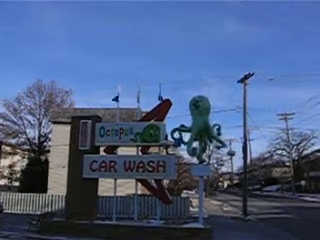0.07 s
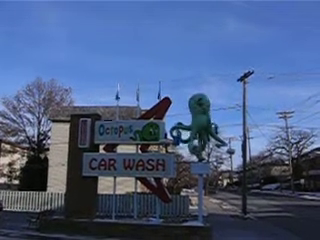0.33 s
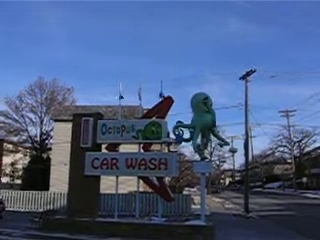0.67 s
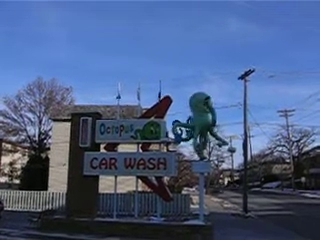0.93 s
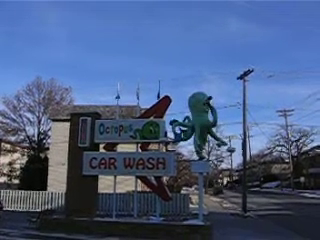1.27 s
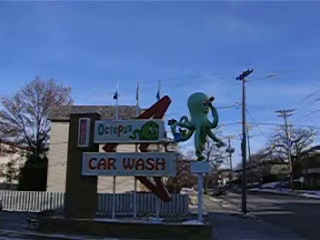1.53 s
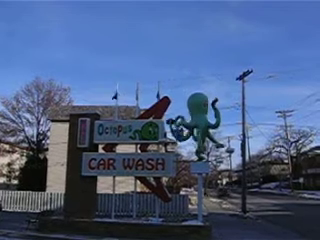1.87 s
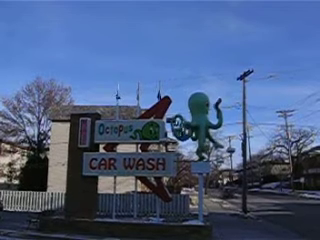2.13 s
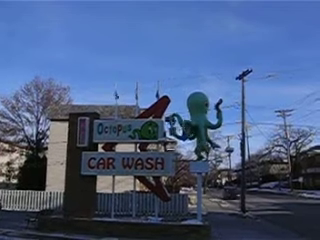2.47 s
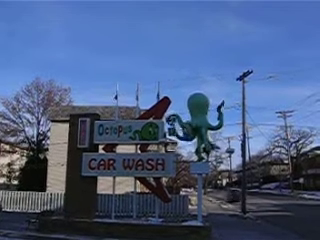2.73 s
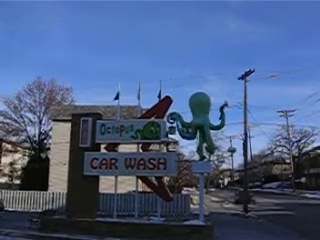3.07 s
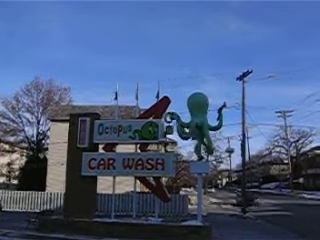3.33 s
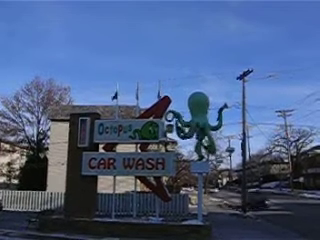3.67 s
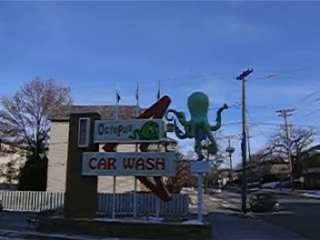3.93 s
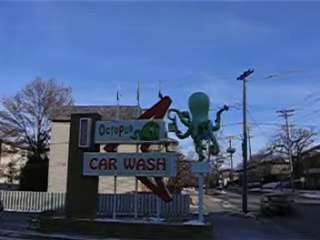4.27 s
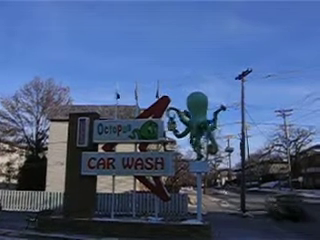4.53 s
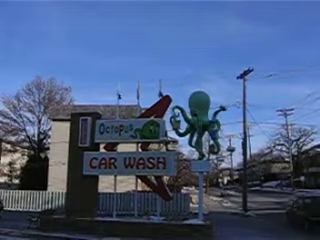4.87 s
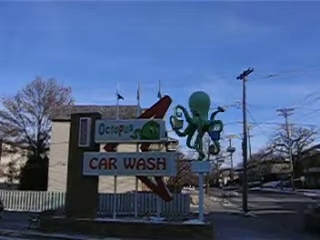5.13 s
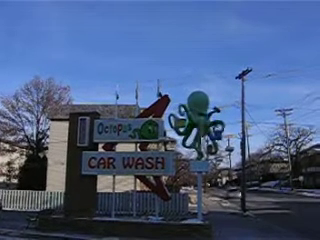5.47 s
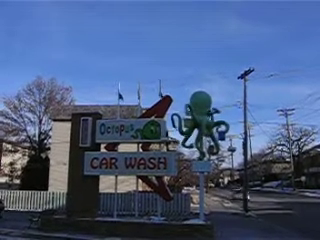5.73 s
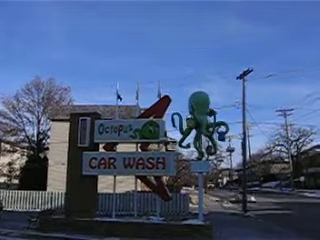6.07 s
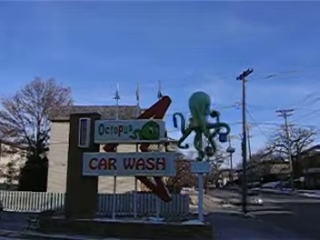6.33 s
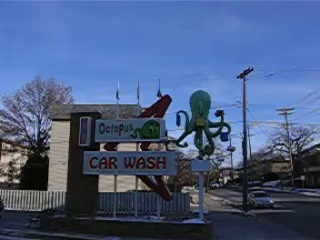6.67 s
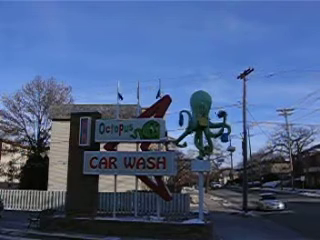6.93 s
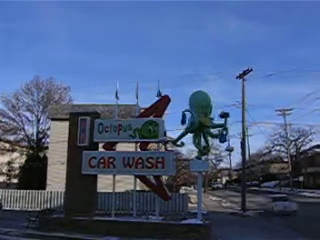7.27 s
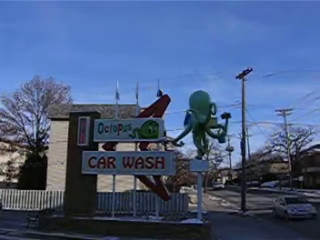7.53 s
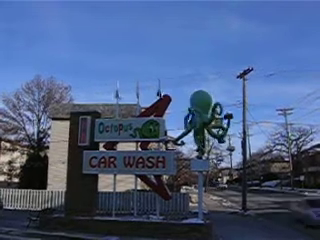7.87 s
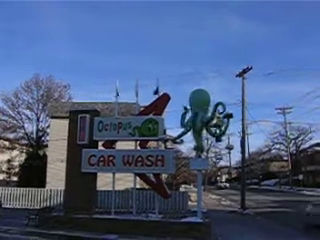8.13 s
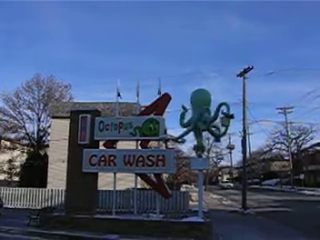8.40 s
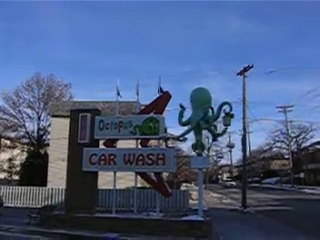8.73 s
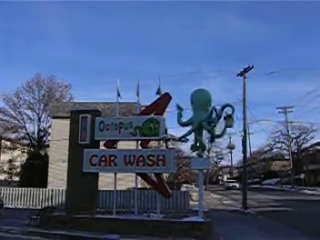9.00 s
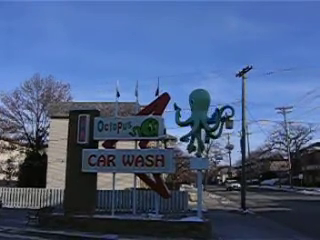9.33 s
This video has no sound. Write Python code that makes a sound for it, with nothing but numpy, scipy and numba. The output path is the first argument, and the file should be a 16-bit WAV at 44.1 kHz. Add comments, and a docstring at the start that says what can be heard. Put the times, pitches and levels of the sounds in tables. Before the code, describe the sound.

Distant engines rumble throughout at a street corner, with a low exhaust drone swelling in slow arches and a steady wash of tyre noise. A faint machine hum, thin whines and an airy whistle sit inside it, joined by very faint high squeals until nearly 6 seconds. A car fades away at the start. Light wind buffets the microphone, with thumps around 2, 2.4 and 3.4 seconds that briefly duck the other sounds. A car approaches and passes close at about 4.7 seconds, its tyres roaring, hissing and rasping. One tiny click comes at 6 seconds as the next car's tyres sing; it passes at about 7 seconds with a deeper boom. A slightly softer car goes by near 9 seconds, with further gusts around 7.7, 8.5 and 9.3 seconds. The sound is mono with dull treble, as from a small camera.

```python
"""A street corner in light wind. Distant engines rumble and one exhaust drones on its firing rate.
Cars roll past, two on the near lane: bodies boom, tyres roar, rush and hiss. A machine's hum, thin
whines, an airy whistle and faint high squeals sit in the tyre noise. Eddies buffet the microphone
port of a small camera, whose limiter ducks everything on loud thumps. There is one tiny click."""
import sys
import numpy as np
from scipy import signal
from scipy.fft import rfft, irfft, next_fast_len
from scipy.io import wavfile
from scipy.ndimage import uniform_filter1d, map_coordinates
from numba import njit

SR = 44100
rng = np.random.default_rng(int(sys.argv[2]) if len(sys.argv) > 2 else 0)


def store_pcm(level_fs):
    """Save levels as 16-bit WAV."""
    pcm = np.round(np.clip(level_fs, -1, 1) * 32767).astype(np.int16)
    wavfile.write(sys.argv[1], SR, np.atleast_2d(pcm).T)


N = 418068
TIME_S = np.arange(N) / SR


def amp(db):
    """Decibels to gain."""
    return 10 ** (np.asarray(db) / 20)


def unit(x):
    """Scale to rms 1."""
    return x / np.sqrt(np.mean(x ** 2) + 1e-20)


def curve(rows):
    """Time-value rows to one value per sample."""
    return np.interp(TIME_S, *np.transpose(rows))


def bell(at_s, sigma_s):
    """Gaussian swell, peak 1."""
    return np.exp(-.5 * ((TIME_S - at_s) / sigma_s) ** 2)


def wobble(rate_hz):
    """Smooth random curve, rate_hz knots a second."""
    knots = rng.standard_normal(int(N * rate_hz / SR) + 4)
    return map_coordinates(knots, [TIME_S * rate_hz])


def filtered(x, response):
    """Zero-phase filter with gain response(hz)."""
    size = next_fast_len(N + 8192)
    return irfft(rfft(x, size) * response(np.fft.rfftfreq(size, 1 / SR)), size)[:N]


def noise(spectrum, patchy_db):
    """Coloured noise, rms 1, with random gain patches in time and frequency."""
    bins = signal.stft(rng.standard_normal(N), nperseg=512)[2]
    patches = uniform_filter1d(rng.standard_normal(bins.shape), size=6, axis=0)
    patches = uniform_filter1d(patches, size=14, axis=1)
    patchy = signal.istft(bins * amp(patchy_db * unit(patches)), nperseg=512)[1][:N]
    hz, db = np.transpose(spectrum)
    colour = lambda f: amp(np.interp(np.log(f + 1), np.log(hz), db, left=-60, right=-120))
    return unit(filtered(patchy, colour))


def tone(hz, order=1):
    """Sine, rms 1, on a multiple of a pitch curve."""
    return np.sqrt(2) * np.sin(2 * np.pi * (order * np.cumsum(hz) / SR + rng.random()))


def fuzzy_tone(hz, width_hz):
    """Narrow noise, rms 1, around a pitch curve."""
    centred = wobble(width_hz) * tone(hz)
    detuned = wobble(width_hz) * tone(hz + .3 * width_hz * wobble(15))
    return unit(centred + detuned)


# start/s, length/s, f/Hz, level/dB
SQUEALS = [(0.357, 0.25, 5235, -55.5), (1.265, 0.27, 5245, -55.5), (1.52, 0.36, 5450, -58.5),
           (1.883, 0.86, 5504, -55.5), (2.939, .25, 5280, -58), (3.305, .33, 5490, -56),
           (3.646, .5, 5500, -51), (4.08, 0.4, 5230, -56.5), (4.677, 0.67, 5235, -57),
           (5.117, 0.56, 5480, -55.5)]

def squeals(fade_s=.05):
    """Faint, chattering squeals far off."""
    starts_s, _, pitches_hz, _ = np.transpose(SQUEALS)
    latest = np.maximum(np.searchsorted(starts_s, TIME_S) - 1, 0)
    hz = pitches_hz[latest]
    gain = sum(amp(db) * np.clip(np.minimum(TIME_S - s, s + length_s - TIME_S) / fade_s, 0, 1)
               for s, length_s, _, db in SQUEALS)
    return .7 * gain * (tone(hz + 6 * wobble(30)) + fuzzy_tone(hz, width_hz=45))


# t/s, level/dB
WHISTLE_SWELLS = [(3.6, -49), (4.6, -49), (7.55, -47), (8.9, -48)]

def whistle(centre_hz=4025, drift_hz=20, rest_db=-49.5):
    """An airy whistle drifts and swells now and then."""
    swells = sum(amp(db) * bell(s, sigma_s=.12) for s, db in WHISTLE_SWELLS)
    return (amp(rest_db) + swells) * fuzzy_tone(centre_hz + drift_hz * wobble(2.5), width_hz=110)


# f/Hz, rms level/dB
WHINES = [(1016, -45), (1215, -52), (1411, -48.5), (1826, -57.5), (2822, -54.5), (4829, -59.5)]

def whines():
    """Thin sustained tones, wavering slightly."""
    return sum(amp(db + 2.4 * wobble(3)) * tone(hz + .83 * wobble(6)) for hz, db in WHINES)


# t/s, level/dB
HUM_LEVEL = [(0, -54.5), (.8, -36.5), (2.1, -48.5), (2.9, -36), (6.3, -35.5), (7.1, -39), (9.48, -42.5)]

def machine_hum(pitch_hz=704.8):
    """A machine hums on one unsteady tone."""
    return amp(curve(HUM_LEVEL) + 1.1 * wobble(7.8)) * tone(pitch_hz + 2.6 * wobble(14))


# f/Hz, relative density/dB
RUMBLE_SPECTRUM = [(35, -23.5), (65, -2), (90, 0.5), (150, -5), (240, -11.5), (340, -16), (500, -23.5),
                   (1200, -60.5)]

def distant_engines(level_db=-24, drift_db=.6):
    """Many engines blur into a rumble."""
    return amp(level_db + drift_db * wobble(5)) * noise(RUMBLE_SPECTRUM, patchy_db=1.17)


# multiple of the firing rate, relative level/dB
EXHAUST_HARMONICS = [(1, 1.5), (2, -14.5), (3, -20.5), (4, -26)]
# start/s, length/s, level/dB
EXHAUST_SWELLS = [(0.302, 1.1, -27), (2.902, .55, -24), (3.642, 1, -24), (5.002, .9, -23.5),
                  (6.15, 0.56, -24.5), (7.25, .9, -24), (8.22, 0.91, -22)]

def exhaust(firing_hz=57.65, rest_db=-32.5):
    """One exhaust drones on its firing rate, swelling in slow arches."""
    swells = sum(amp(db) * np.sin(np.pi * np.clip((TIME_S - s) / length_s, 0, 1))
                 for s, length_s, db in EXHAUST_SWELLS)
    hz = firing_hz + .5 * wobble(4)
    drone = sum(amp(db + 1.4 * wobble(2.2)) * tone(hz, order) for order, db in EXHAUST_HARMONICS)
    return np.hypot(swells, amp(rest_db)) * drone


# t/s, relative level/dB
WIND_STRENGTH = [(0.0, -23), (1.5, -21), (3.99, -28), (9.0, -27), (9.13, -22.5), (9.48, -27.5)]
# t/s, sigma/s, thump/dB, flutter/dB
GUSTS = [(0.28, 0.095, -27.5, -27.5), (1.009, 0.058, -32.5, -20), (1.95, 0.072, -14.5, -33),
         (2.418, .06, -18, -40), (3.425, 0.05, -17, -22), (7.744, .06, -19, -34),
         (8.477, 0.079, -21, -23.5), (9.287, 0.06, -21.5, -26)]
# f/Hz, relative density/dB
BUFFET_SPECTRUM = [(8, -8), (20, 0), (35, -1), (55, -4.5), (90, -8.5), (200, -22.5), (500, -38.5),
                   (1500, -78)]

def wind(lump_db=.94, lump_rate_hz=13):
    """Eddies thump the microphone port in uneven lumps; sharp gusts add a higher flutter."""
    breeze = amp(curve(WIND_STRENGTH) + 2.5 + lump_db * wobble(lump_rate_hz))
    thumps = sum(amp(db) * bell(s, sigma_s) for s, sigma_s, db, _ in GUSTS)
    flutter = sum(amp(db) * bell(s, sigma_s) for s, sigma_s, _, db in GUSTS)
    buffet = np.hypot(breeze, thumps) * noise(BUFFET_SPECTRUM, patchy_db=1.5)
    flutter_spectrum = [(70, -18.5), (125, 1), (200, -4.5), (300, -6), (600, -32.5)]
    return buffet + flutter * noise(flutter_spectrum, patchy_db=0)


# passing t/s, tyre roar/dB, tyre rush/dB, tread hiss/dB, body boom/dB
CARS = [(0, -34.5, -42, -45.5, -39.5), (4.72, -27, -32.5, -34, -43), (6.95, -27, -30.5, -38.5, -32.5),
        (8.9, -29, -37.5, -36, -38)]

def traffic(layer, far_db, reach, approach_s=.98, leave_s=.93):
    """Gain of one layer: cars fall off as 1/distance and add in power to far traffic."""
    pass_s, *levels_db = np.transpose(CARS)
    car_db = levels_db[("roar", "rush", "hiss", "boom").index(layer)]
    since_s = TIME_S - pass_s[:, None]
    half_power_s = reach * np.where(since_s < 0, approach_s, leave_s)
    nearness = 1 / np.hypot(1, since_s / half_power_s)
    return np.sqrt(amp(far_db) ** 2 + amp(car_db) ** 2 @ nearness ** 2)


# f/Hz, relative density/dB
BOOM_SPECTRUM = [(150, -13.5), (240, 4), (310, -5), (450, -7), (700, -22.5)]

def car_bodies():
    """Each car's body booms as it passes."""
    return traffic("boom", far_db=-51.5, reach=.8) * noise(BOOM_SPECTRUM, patchy_db=1.5)


def tyre_song(centre_hz=790, level_db=-33):
    """The tyres of a car still coming head-on sing in a narrow band."""
    return amp(level_db) * bell(6.1, sigma_s=.39) * fuzzy_tone(np.full(N, centre_hz), width_hz=300)


# Tyre noise: f/Hz, relative density/dB
ROAR_SPECTRUM = [(200, -19), (370, -9), (460, -1), (600, -0.5), (750, -1), (950, -0.5), (1080, -4),
                 (1250, -12.5), (1600, -23), (2500, -47.5)]
RUSH_SPECTRUM = [(500, -23.5), (1000, -4), (1300, 1), (1500, 2), (1800, -1), (1980, -5.5), (2300, -6),
                 (3000, -15.5), (5000, -31)]
HISS_SPECTRUM = [(1200, -17), (1950, -11), (2250, 1), (2550, 0), (2830, 1), (3080, -4.5), (3800, -5),
                 (4000, -3), (4220, -7), (4500, -10), (5100, -14), (5450, -17.5), (5600, -28.5)]
RASP_SPECTRUM = [(1450, -20), (1780, 0.5), (1980, -16.5), (2200, -2), (2500, -3.5), (3200, -14),
                 (4500, -25.5)]

def tyres(rasp_db=-35, flicker_db=.25):
    """Tyres roar; near cars add a brighter rush and tread hiss, and the nearest rasps."""
    roar = traffic("roar", far_db=-31, reach=1.06) * noise(ROAR_SPECTRUM, patchy_db=.6)
    rush = traffic("rush", far_db=-43.5, reach=.67) * noise(RUSH_SPECTRUM, patchy_db=1.13)
    hiss = traffic("hiss", far_db=-40, reach=1.22) * noise(HISS_SPECTRUM, patchy_db=0)
    rasp = amp(rasp_db) * bell(4.95, sigma_s=.35) * noise(RASP_SPECTRUM, patchy_db=1)
    return amp(flicker_db * wobble(14)) * (roar + rush + hiss + rasp)


def scene():
    """Mono sum at the microphone."""
    lows = wind() + distant_engines() + car_bodies() + exhaust()
    return (lows + tyres() + tyre_song() + machine_hum() + whines() + whistle() + squeals())[None]


@njit
def peak_follower(x, attack, release):
    """Envelope that jumps with each peak and sinks slowly."""
    envelope = np.empty_like(x)
    level = 0.
    for i in range(len(x)):
        size = abs(x[i])
        level += (size - level) * attack if size > level else -level * release
        envelope[i] = level
    return envelope


def limiter(x, drive_db, ceiling_db, attack_s, release_s):
    """Peaks over the ceiling pull the gain down; it then recovers."""
    driven = x * amp(drive_db)
    envelope = peak_follower(driven, 1 - np.exp(-1 / (attack_s * SR)), 1 / (release_s * SR))
    return driven / np.maximum(1, envelope / amp(ceiling_db))


# Treble roll-off: f/Hz, gain/dB
ROLL_OFF = [(4800, -0.5), (5250, -1.5), (5512, -4.5), (5800, -13.5), (6200, -36.5)]

def coarse_sampling(x, step, top_hz):
    """Keeping one sample in step mirrors the treble; a soft filter trims the image."""
    kept = step * x * (np.arange(N) % step == 0)
    return filtered(kept, lambda hz: amp(np.interp(hz, *np.transpose(ROLL_OFF))) * (hz < top_hz))


def click(at_s=6.0208, level_db=-12, decay_s=.0003):
    """One abrupt jump, with tails under a millisecond rising into it and relaxing after it."""
    since_s = TIME_S - at_s
    return -amp(level_db) * np.sign(since_s) * np.exp(-np.abs(since_s) / decay_s)


def record(dry):
    """The camera limits the level, samples coarsely and clicks once."""
    limited = limiter(dry[0], drive_db=1.86, ceiling_db=-10.5, attack_s=.00015, release_s=.069)
    dulled = coarse_sampling(limited, step=4, top_hz=6250)
    return filtered(dulled + click(), lambda hz: hz < 16000)[None]


dry = scene()
out = record(dry)
store_pcm(out)
```